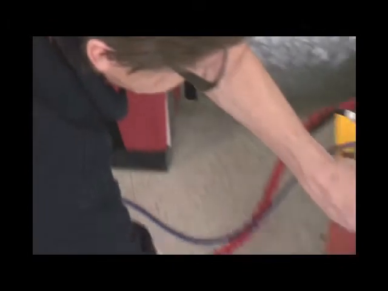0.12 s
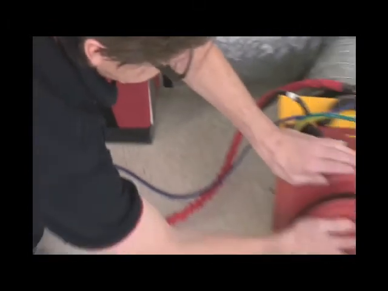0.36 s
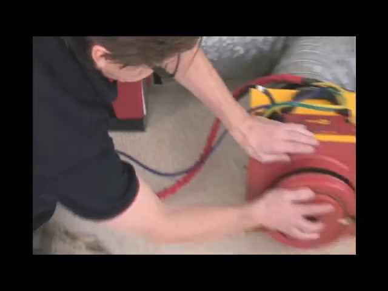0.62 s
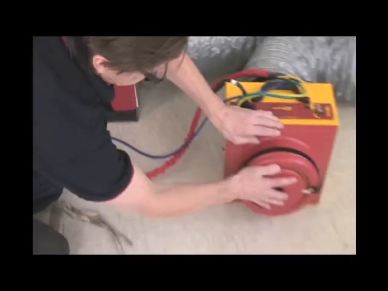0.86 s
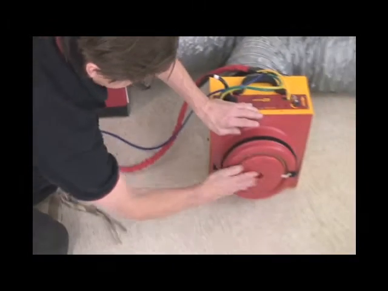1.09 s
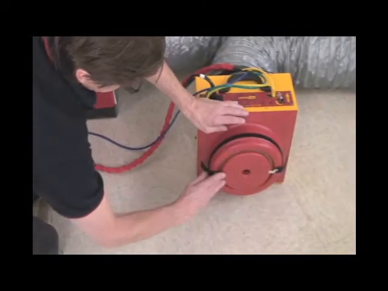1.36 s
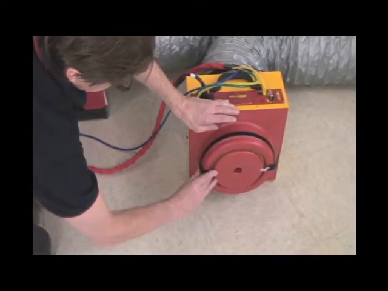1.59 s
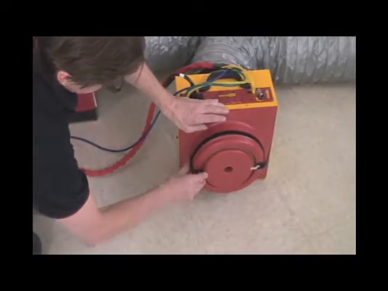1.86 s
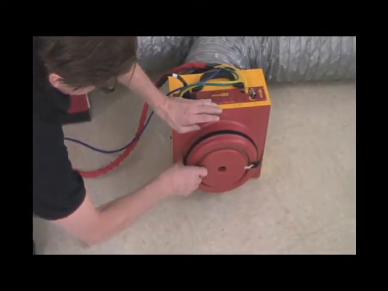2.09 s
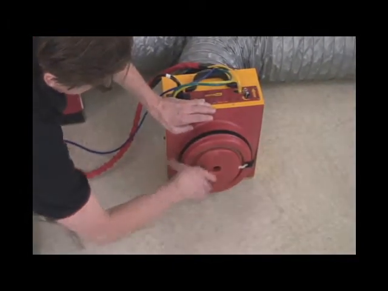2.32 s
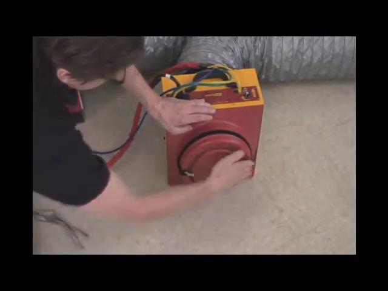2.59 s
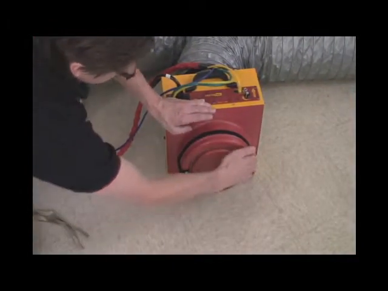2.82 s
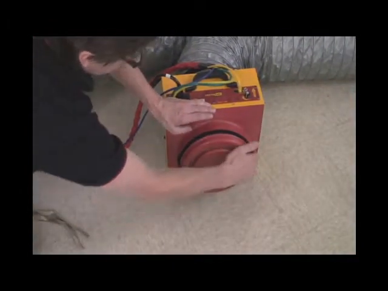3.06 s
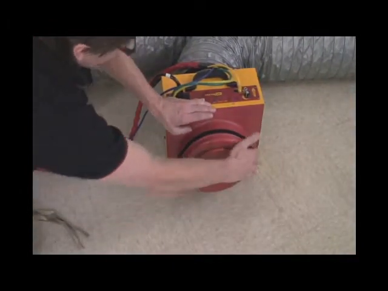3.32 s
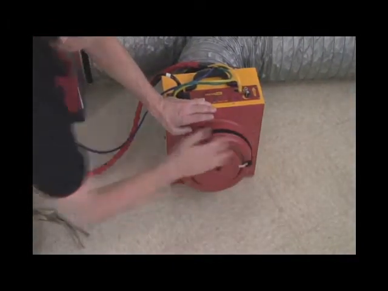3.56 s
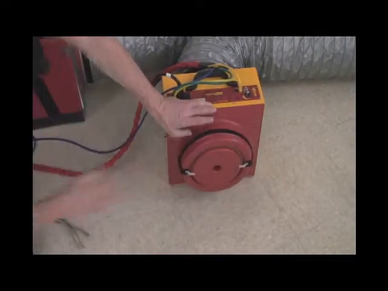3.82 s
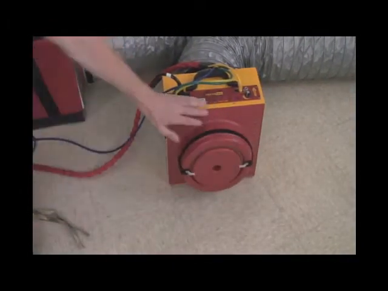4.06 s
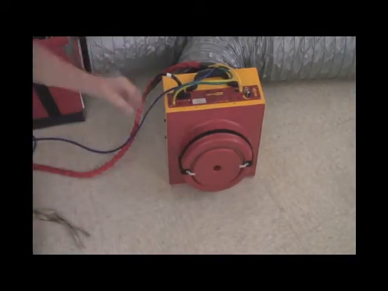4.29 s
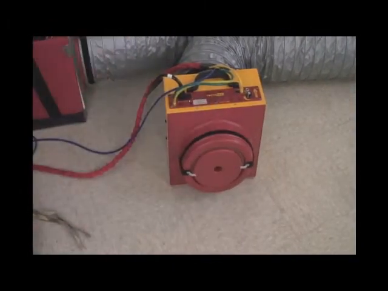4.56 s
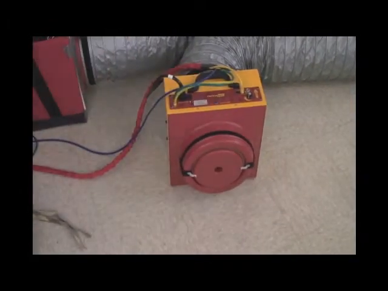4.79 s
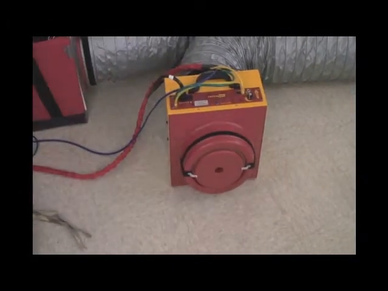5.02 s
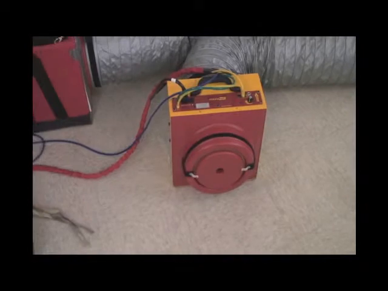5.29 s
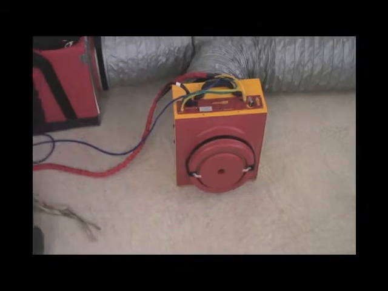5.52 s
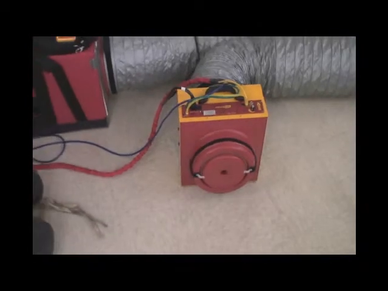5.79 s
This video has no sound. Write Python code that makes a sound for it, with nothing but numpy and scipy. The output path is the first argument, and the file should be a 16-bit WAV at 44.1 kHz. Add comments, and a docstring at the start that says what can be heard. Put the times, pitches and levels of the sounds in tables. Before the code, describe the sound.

A boxed electric fan hums with a buzzy, fluttering drone throughout, very slowly gaining speed. Close by, hands scrape and press a plastic lid, with hollow knocks and sharp clip snaps during the first three and a half seconds. The person then steps back with soft cloth rustle, leaving hum, thin ticks and a small shoe creak. Small carpeted room, one nearby microphone, little deep bass.

```python
"""In a carpeted room a boxed test fan runs slowly, its motor creeping up in speed from first to last.
Chopped mains current hums in the plastic case as sums of sines, over a wash of shaped noise.
From the start hands slide over the inlet lid (rubbing noise), tap it (cracks, ringing modes) and snap clips.
Then the person steps back: cloth rustles as noise, thin ticks and creaks sound as tiny cracks, tones shift.
One microphone hears it all, with its deep bass cut and a faint rumble of its own."""
import sys
import numpy as np
from scipy import signal
from scipy.io import wavfile
from scipy.ndimage import uniform_filter1d

SR = 44100
rng = np.random.default_rng(int(sys.argv[2]) if len(sys.argv) > 2 else 0)


def digitize_waveform(pressure):
    """Quantize a signal to 16-bit integers and store it at the path in sys.argv[1].

    Rows of a 2-D input are taken as channels; values are limited to [-1, 1].
    """
    field = np.atleast_2d(pressure).T
    bounded = np.clip(field, -1, 1)
    quanta = np.round(bounded * 32767).astype(np.int16)
    wavfile.write(sys.argv[1], SR, quanta)


def boost(x):
    """Linear amplitude factor 10**(x/20) for a level x in decibels (scalar or array-like)."""
    u = np.asarray(x, float) / 20
    return 10 ** u


N = 260087  # samples

PULL_HZ = 120.04  # magnetic pull, twice a mains cycle
START_TURN = 0.64  # rotor angle at the start, in turns
PANEL_HZ, PANEL_WIDTH_HZ = 938.4, 26  # case resonance
LEAVE_S, LEAVE_SPAN_S = 4.57, 0.4  # the person leaves the side of the case
# The rotor creeping up in speed. Each row: time in seconds, rotor turns per second.
ROTOR_SPEED = [(0, 14.02), (.5, 14.34), (1, 14.72), (1.5, 15.11), (2, 15.5), (2.5, 15.88), (3, 16.31),
               (3.5, 16.73), (4, 17.19), (4.5, 17.73), (5, 18.27), (5.5, 18.85), (5.9, 19.27)]
# Motor tones in the case. Each row: multiple of the pull, multiple of the rotor speed.
STEADY_TONES = [(1, 0), (4, 0), (10, 0), (11, 0), (12, 0), (14, 0), (1, -1), (4, -1), (4, 1), (5, -1),
                (5, 1), (1, 3), (3, 3), (3, 5), (0, 11), (1, 11), (2, 11), (1, 13), (1, 15)]
# Mean level of each of those tones, in dB rms.
STEADY_TONES_DB = [-77, -69.5, -73.5, -77, -81.5, -103, -73, -74, -68.5, -81, -74.5, -79, -93, -65.5, -72,
                   -80, -76, -65.5, -86]
# Louder tones, shifting as the person leaves. Each row: pull multiple and rotor multiple (both rounded
# to whole numbers in use), level in dB rms with the person beside the case, level in dB rms after.
SHADED_TONES = [(2, 0, -64, -62.5), (3, 0, -60.5, -74), (5, 0.5, -64.5, -74), (6, -0.5, -74.5, -72.5),
                (2, -1, -57.5, -56), (2, 1.5, -61, -62.5), (3, -1, -57.5, -70), (3, 1, -56.5, -57),
                (6, 1, -68, -59.5), (2, 3, -62, -77), (1, 5, -65, -71), (2, 4.5, -66, -71),
                (27, -0.5, -86, -84), (1, 7.5, -65, -77)]
# Five clear hum tones, as multiples of the pull.
HUM_MULTIPLES = [7, 8, 9, 13, 28]
# Their changing levels. Each row: time in seconds, then the level of each of the five in dB rms.
HUM_LEVELS = [(0, -52, -50.5, -67, -74, -86), (.8, -51, -50, -65, -72, -86),
              (1.6, -51, -48, -64.5, -73, -83), (2.4, -49, -51, -61, -72.5, -85),
              (3.2, -50, -55, -58, -64.5, -75), (3.9, -49, -48, -64, -62.5, -74),
              (4.5, -50, -46, -62.5, -70.5, -86), (5.1, -53.5, -48, -59.5, -87, -80),
              (5.9, -56, -49.5, -65.5, -71, -84)]
# Rotor-slot whines sweeping past the case resonance. Each row: pull multiple, rotor multiple.
SLOT_WHINES = [(0, 66), (-1, 66), (-2, 66), (-3, 66), (1, 44), (2, 44), (5, 22)]
# Level of each whine when it is on the resonance, in dB rms.
SLOT_WHINES_DB = [-60, -53, -56, -68, -62, -68, -63]


def motor():
    """Sines at sums of pull and rotor multiples; side tones share their pull's phase, so hum throbs each turn."""
    t = np.arange(N) / SR
    speed = np.interp(t, *np.transpose(ROTOR_SPEED))
    pull = PULL_HZ * t + 0.022 * slow(rate=0.454)  # cycles, slightly unsteady
    turns = START_TURN + np.cumsum(speed) / SR
    phase = rng.random(40)

    def tone(k, m):
        """A sine of rms 1 at k times the pull plus m times the rotor speed."""
        return np.sqrt(2) * np.sin(2 * np.pi * (k * pull + m * turns + phase[k]))

    out = np.zeros(N)
    for (k, m), db in zip(STEADY_TONES, STEADY_TONES_DB):
        out += boost(db + 2.1 * slow(rate=3.5)) * tone(k, m)
    gone = 0.5 + 0.5 * np.tanh((t - LEAVE_S) / LEAVE_SPAN_S)  # 0 beside the case, 1 after
    for k, m, near_db, gone_db in SHADED_TONES:
        level_db = near_db + (gone_db - near_db) * gone + 1.7 * slow(rate=3.3)
        out += boost(level_db) * tone(round(k), round(m))
    s, *levels = np.transpose(HUM_LEVELS)
    for k, db in zip(HUM_MULTIPLES, levels):
        out += boost(np.interp(t, s, db) + 0.8 * slow(rate=5)) * tone(k, 0)
    for (k, m), db in zip(SLOT_WHINES, SLOT_WHINES_DB):
        off = (k * PULL_HZ + m * speed - PANEL_HZ) / (PANEL_WIDTH_HZ / 2)
        out += boost(db) / np.sqrt(1 + off ** 2) * tone(k, m)
    return out


TOUCH_DB_PER_S, LIFT_DB_PER_S = 2500, 800  # how fast a stroke sets in and lets go
BEND = 1.64  # above 1 the level moves fastest at the loud end of a stroke
# Strokes of a hand on the lid. Each row: start in seconds, end in seconds, hiss level in dB at the start,
# and at the end (both before the palm's lift), dB over that hiss of the duller drag that shakes the case,
# cavity under the palm in Hz.
HAND_STROKES = [(0, 0.04, -53, -57, 6.5, 5260), (0.284, 0.352, -68, -55.5, -10, 5900),
                (0.364, 0.395, -49.5, -43, 1, 6550), (0.417, 0.503, -51.5, -44, 7.5, 5930),
                (0.734, 0.756, -54.5, -57.5, 14, 5140), (.824, 0.922, -52.5, -58, 5.5, 5900),
                (1.07, 1.214, -55.5, -67, -5, 7500), (1.228, 1.406, -56, -60, -3, 5400),
                (1.423, 1.548, -50.5, -60.5, -3.5, 6250), (1.572, 1.574, -48, -53, -16, 5270),
                (1.768, 1.788, -60, -60, -12, 4940), (1.797, 2.003, -50, -53.5, -1, 5900),
                (2.022, 2.089, -52, -43, -5, 6300), (2.11, 2.224, -69, -64, 0, 5600),
                (2.232, 2.338, -48, -62.5, -17, 4830), (2.353, 2.404, -54, -56.5, 2, 5800),
                (2.426, 3.196, -68, -62.5, 5.5, 5200), (2.811, 2.962, -50.5, -62, -8, 7100),
                (3.369, 3.492, -54.5, -61.5, 4, 4070), (3.501, 3.546, -55.5, -45.5, -1.5, 4400),
                (3.554, 3.602, -59, -61, 9.5, 4800), (3.618, 3.704, -55.5, -65, 8.5, 5300)]
# Colour of the hiss under the hand. Each row: frequency in Hz, relative level in dB per Hz.
HAND_HISS = [(1500, 1.5), (3000, 4.5), (6000, 0), (9000, 3), (11500, 3), (12700, 7.5), (14000, 0),
             (15600, -0.5), (16000, -31)]
# Colour of the drag under the hand. Each row: frequency in Hz, relative level in dB per Hz.
HAND_DRAG = [(100, -31), (170, -21), (250, 3.5), (330, -4.5), (550, 12.5), (1000, 3), (1400, 0.5),
             (1850, 5), (2300, -9), (5000, -37)]
# The lid juddering as it is pushed home. One row: start in seconds, end in seconds, mean slips per second,
# depth from 0 to 1.
LID_JUDDER = (.405, .52, 165, 0.49)


def strokes():
    """Hands rub the lid: each stroke sets in fast, swells or fades, and lets go; a stick-slip judder shakes it."""
    t = np.arange(N) / SR
    t0, t1, rate, depth = LID_JUDDER
    slips = np.cos(2 * np.pi * np.cumsum(rate * (1 + 0.098 * slow(rate=30))) / SR)
    shake = 1 + depth * slips * (t > t0) * (t < t1)
    hiss, drag = friction(HAND_HISS, HAND_DRAG)
    out = np.zeros(N)
    for start, end, start_db, end_db, drag_db, cavity_hz in HAND_STROKES:
        # leave room for the edges before and after
        now = slice(max(round((start - 0.05) * SR), 0), round((end + 0.12) * SR))
        touch_db = TOUCH_DB_PER_S * np.maximum(start - t[now], 0)
        lift_db = LIFT_DB_PER_S * np.maximum(t[now] - end, 0)
        palm = cupped(hiss[now], cavity_hz, added_db=4.5, width=500)
        loud_ends = [start_db > end_db, end_db >= start_db]
        toward_loud = np.interp(t[now], [start, end], loud_ends) ** BEND
        level_db = min(start_db, end_db) + abs(end_db - start_db) * toward_loud
        out[now] += boost(level_db - touch_db - lift_db) * (palm + boost(drag_db) * drag[now])
    return shake * out


CRACK_T60 = 0.016  # s for the grit of a crack to fall 60 dB
# Knocks on the lid. Each row: time in seconds, crack peak in dB before the body is added,
# gain in dB of the crack's treble against its hump, drive of the case ring in dB, drive of the thud in dB.
LID_KNOCKS = [(0.4897, -30.5, -16, -35, -54), (0.7354, -34, -26, -34.5, -45), (0.7451, -26, -8, -36, -48.5),
              (0.828, -28, -1, -44, -68), (0.9095, -31.5, -10, -39.5, -67), (1.067, -42, -11, -43, -55),
              (1.2291, -45, -7, -47, -57), (1.5696, -38, 3, -41, -44.5), (1.708, -23.5, -18.5, -40, -59),
              (1.7916, -23, -14, -37.5, -57), (2.0918, -22.5, -9.5, -27, -50),
              (2.2504, -33, -9, -34.5, -73), (3.5429, -30, -18, -48, -70), (3.7295, -39, -28, -35, -68)]
# Clip snaps. Each row: time in seconds, peak level in dB, centre in Hz.
CLIP_SNAPS = [(0.8204, -39, 3030), (1.7768, -37, 6000), (2.356, -27, 3770), (2.3722, -32, 2830),
              (2.3892, -27.5, 5460), (2.396, -26.5, 7540), (2.804, -35, 4500), (3.444, -28.5, 4180),
              (3.509, -35, 3610), (3.5259, -36, 3570), (3.6124, -32.5, 4000), (3.647, -41, 1810)]
# Lid and case modes, as centres for chance. Each row: frequency in Hz, level in dB, seconds to fall 60 dB.
CASE_MODES = [(394, 1, 0.034), (493, 2.5, 0.035), (564, 6.5, 0.034), (659, 2.5, 0.048), (812, -0.5, 0.039),
              (1057, -1, 0.023), (1062, 4, 0.03), (1386, 3, 0.016), (1640, 4, 0.011)]
# The whole box on the carpet, likewise. Each row: frequency in Hz, level in dB, seconds to fall 60 dB.
BOX_MODES = [(119.6, 0.5, 0.17), (182, 11, .09)]


def taps():
    """A knock is a sharp crack that sets the case modes and the box thud going; a clip snap is a crack alone."""
    t, out = np.arange(SR // 6) / SR, np.zeros(N)
    case_end = len(t) + 2 * len(CASE_MODES)
    chance = rng.standard_normal((len(LID_KNOCKS), case_end + 2 * len(BOX_MODES)))
    for (s, crack_db, treble_db, ring_db, thud_db), draw in zip(LID_KNOCKS, chance):
        grit, case, box = np.split(draw, [len(t), case_end])
        blow = boost(crack_db) * crack(grit, 2480, treble_db, CRACK_T60, span=1.92)
        # the modes build up over a few milliseconds
        body = boost(ring_db) * ring(CASE_MODES, t, case) * (1 - np.exp(-t / 0.0017))
        thud = boost(thud_db) * ring(BOX_MODES, t, box) * (1 - np.exp(-t / 0.0065))
        add(out, s, blow + body + thud)
    for (s, db, hz), grit in zip(CLIP_SNAPS, rng.standard_normal((len(CLIP_SNAPS), 2000))):
        add(out, s, boost(db) * crack(grit, hz, treble_db=-29, t60=CRACK_T60, span=1.8))
    return out


# Clothes and shoes as the person steps back. Each row: time in seconds, hiss level in dB (before its
# resonance is added), level in dB of the duller drag.
STEP_BACK = [(3.68, -68, -59), (3.76, -61.5, -54), (3.84, -51, -45), (4.0, -51, -48.5), (4.21, -55.5, -60),
             (4.44, -54.5, -55.5), (4.485, -52.5, -52), (4.57, -68, -64), (4.704, -63, -67),
             (4.87, -71, -70), (5.06, -61, -66), (5.44, -62, -54), (5.54, -56.5, -63), (5.69, -59.5, -66),
             (5.76, -65, -77), (5.9, -70, -68)]
# Colour of the cloth hiss. Each row: frequency in Hz, relative level in dB per Hz.
RUSTLE_HISS = [(1200, 6), (3000, -4), (6000, 0.5), (12700, -2), (15600, -10), (16000, -30)]
# Colour of the cloth drag. Each row: frequency in Hz, relative level in dB per Hz.
RUSTLE_DRAG = [(150, -10), (450, 10), (900, 6), (1800, 1.5), (3000, -2), (5000, -18.5)]


def rustle():
    """Clothes and shoes rub as hiss and drag, silent until the person starts to step back."""
    t = np.arange(N) / SR
    s, hiss_db, drag_db = np.transpose(STEP_BACK)
    hiss, drag = friction(RUSTLE_HISS, RUSTLE_DRAG)
    hiss = cupped(hiss, 2950, added_db=6, width=700)
    rubbing = boost(np.interp(t, s, hiss_db)) * hiss + boost(np.interp(t, s, drag_db)) * drag
    return (t > s[0]) * rubbing


TICK_T60 = 0.0073  # s for the grit of a tick to fall 60 dB
CREAK_GAP_S = 0.0155  # mean gap between the slips of a creak
# The clearest thin ticks with no body, as of cloth, cable or duct foil. Each row: time in seconds,
# peak level in dB, centre in Hz.
CLEAR_TICKS = [(2.718, -28, 10000), (2.970, -42, 11000), (3.637, -37, 11000), (4.516, -42, 3500),
               (4.708, -41, 4000), (4.788, -37, 7460), (4.8625, -45, 7000), (5.079, -38, 8500),
               (5.093, -44, 5000), (5.157, -35, 10500), (5.182, -38, 11000), (5.1975, -40, 10000),
               (5.818, -40, 8000)]
# Fainter ticks at random. One row: from seconds, to seconds, how many, mean peak level in dB,
# lowest centre in Hz, highest centre in Hz.
RANDOM_TICKS = (2.9, 5.85, 5, -48, 6000, 12000)
# Short creaks, as of a shoe. Each row: start in seconds, number of slips, mean peak level of a slip in dB.
SHOE_CREAKS = [(4.29, 3, -45.5), (5.477, 6, -43)]


def ticks():
    """Thin cracks: clear ticks, faint ones at random, and the uneven slips of creaks, narrower in pitch."""
    t0, t1, count, faint_db, low_hz, high_hz = RANDOM_TICKS
    rows = list(CLEAR_TICKS)
    for a, b, c in rng.random((count, 3)):
        rows.append((t0 + (t1 - t0) * a, faint_db + 4 * (b - 0.5), low_hz + (high_hz - low_hz) * c))
    out = np.zeros(N)
    for (s, db, hz), grit in zip(rows, rng.standard_normal((len(rows), 2000))):
        add(out, s, boost(db) * crack(grit, hz, treble_db=-16, t60=TICK_T60, span=1.55))
    for s, slips, db in SHOE_CREAKS:
        for k, (late, louder, *grit) in enumerate(rng.standard_normal((round(slips), 2002))):
            slip = crack(np.array(grit), 3150, treble_db=-20, t60=CRACK_T60, span=1.16)
            add(out, s + CREAK_GAP_S * (k + 0.15 * late), boost(db + 1.5 * louder) * slip)
    return out


# Colour of the air and room wash. Each row: frequency in Hz, relative level in dB per Hz.
AIR_WASH = [(90, -35), (130, -11.5), (200, -9.5), (350, 1), (500, -7), (680, 0), (900, -9.5), (1150, -17),
            (2000, -16), (4000, -24), (12500, -28), (15000, -32.5), (16000, -50)]


def air():
    """Air and room wash: steady shaped noise whose level drifts slightly."""
    wash = noise(AIR_WASH, size=2048, patchy_db=1.0, flicker_db=-1.53)
    return boost(-52.5 + 0.5 * slow(rate=3.0)) * wash


ROOM_T60 = 0.25  # s for the echoes to fall 60 dB at 3 kHz


def room(x):
    """Sparse echoes of random sign from the room, the treble dying sooner."""
    at = np.arange(200, SR // 2, 22)
    echoes = np.zeros(SR // 2 + 22)
    echoes[at + rng.integers(0, 22, len(at))] = rng.choice([-1., 1.], len(at))
    hz, t, z = signal.stft(echoes, SR, nperseg=256)
    fall_db = -60 * t / ROOM_T60 * (0.5 + hz[:, None] / 6000)
    tail = signal.istft(z * boost(fall_db), SR, nperseg=256)[1]
    return signal.fftconvolve(x, tail / np.linalg.norm(tail))[:N]


def crack(grit, hz, treble_db, t60, span):
    """One sharp blow and its dying grit, through a hump round hz and a treble shelf; peak 1."""
    t = np.arange(len(grit)) / SR
    blow = grit * boost(-60 * t / t60) + 6.6 * (t == 0)
    blow += 0.14 * np.roll(blow, round(0.001222 * SR))  # the part bounces once
    hump_band = [hz / span, min(hz * span, SR / 2.2)]
    hump = signal.lfilter(*signal.butter(2, hump_band, "band", fs=SR), blow)
    shelf = signal.lfilter(*signal.butter(2, 6000, "high", fs=SR), blow)
    sound = hump + boost(treble_db) * shelf
    return sound / abs(sound).max()


def ring(modes, t, draw):
    """Modes as dying sines, each with a chance weight and a slight chance detuning."""
    hz, db, t60 = np.transpose(modes)[:, :, None]
    weight, detune = draw.reshape(2, -1, 1)
    level = boost(db + 1.13 * weight - 60 * t / t60)
    return (level * np.sin(2 * np.pi * hz * (1 + 0.043 * detune) * t)).sum(0)


def friction(hiss_spectrum, drag_spectrum):
    """The two grains of rubbing: a gritty hiss and a duller drag."""
    hiss = noise(hiss_spectrum, size=256, patchy_db=1.0, flicker_db=2.0)
    drag = noise(drag_spectrum, size=512, patchy_db=2.5, flicker_db=2.5)
    return hiss, drag


def cupped(hiss, hz, added_db, width):
    """Adds a resonance of the hiss to itself, as a cavity does; hz and width in Hz."""
    return hiss + boost(added_db) * resonate(hiss, np.full(len(hiss), hz), width)


def resonate(x, hz, width):
    """Resonance of gain 1: shifts the curve hz down to zero, smooths, and shifts back."""
    turn = np.exp(2j * np.pi * np.cumsum(hz) / SR)
    r = np.exp(-np.pi * width / SR)
    return 2 * (turn * signal.lfilter([1 - r], [1, -r], x / turn)).real


def noise(spectrum, size, patchy_db, flicker_db):
    """Random short-time spectra of rms 1, patchy in time and pitch, with a flicker shared by all pitches."""
    frames, hz = 4 * N // size + 5, np.fft.rfftfreq(size, 1 / SR)
    a, b, patches = rng.standard_normal((frames, len(hz), 3)).T
    patches = uniform_filter1d(patches, size // 64, 0)  # across pitch
    patches = evened(uniform_filter1d(patches, 8192 // size, 1))  # across time
    flicker = rng.standard_normal(frames)
    level_db = read(spectrum, hz)[:, None] + patchy_db * patches + flicker_db * flicker
    z = (a + 1j * b) * boost(level_db)
    return evened(signal.istft(z, nperseg=size, noverlap=3 * size // 4)[1][:N])


def slow(rate):
    """Slow chance of rms 1: summed sines of up to rate cycles a second."""
    t = np.arange(0, N + 256, 256) / SR
    waves = np.zeros(len(t))
    for f in np.geomspace(rate / 20, rate, 12):
        waves += np.sin(2 * np.pi * (f * t + rng.random())) / np.sqrt(f)
    return np.interp(np.arange(N), t * SR, evened(waves))


def evened(x):
    """Scales to rms 1."""
    return x / np.sqrt(np.mean(x ** 2) + 1e-20)


def read(points, hz):
    """Reads a spectrum on a log-frequency axis."""
    f, value = np.transpose(points)
    return np.interp(np.log(hz + 1), np.log(f + 1), value)


def add(mix, s, sound):
    """Mixes a sound in at time s."""
    part = mix[round(s * SR):][:len(sound)]
    part += sound[:len(part)]


def scene():
    """Motor, handling and air wash; the room answers the knocks, snaps, ticks and creaks."""
    knocks = taps() + ticks()
    echoes = boost(-15) * room(knocks)
    mix = motor() + strokes() + knocks + rustle() + echoes + air()
    return mix[None]  # one channel


def top_cut(x):
    """Nothing passes above the cut-off."""
    return signal.sosfilt(signal.butter(12, 16370, fs=SR, output="sos"), x)


def record(dry):
    """The microphone cuts the deep bass and adds a faint rumble of its own."""
    corner_hz = 115.6
    cut = signal.sosfilt(signal.butter(4, corner_hz, "high", fs=SR, output="sos"), dry)
    hiss = rng.standard_normal(dry.shape)
    rumble = signal.sosfilt(signal.butter(2, corner_hz, fs=SR, output="sos"), hiss)
    finished = cut + boost(-79.5) * evened(rumble)
    return top_cut(finished)


dry = scene()
out = record(dry)
digitize_waveform(out)
```